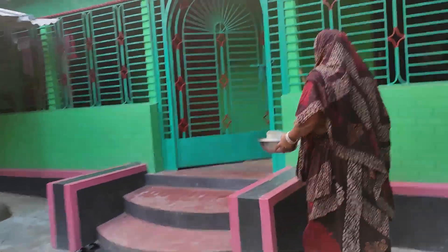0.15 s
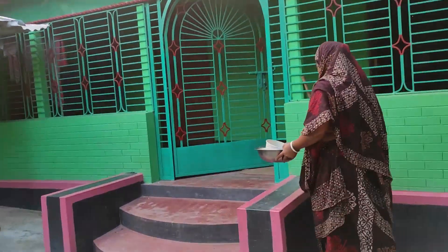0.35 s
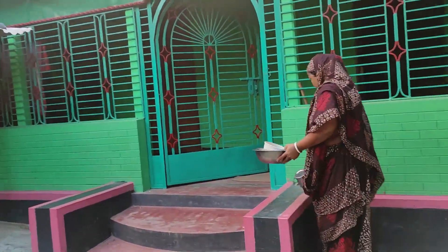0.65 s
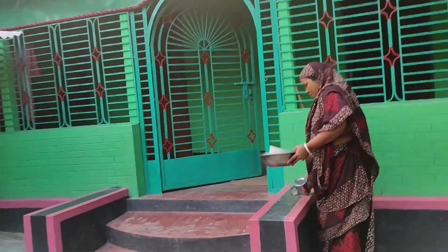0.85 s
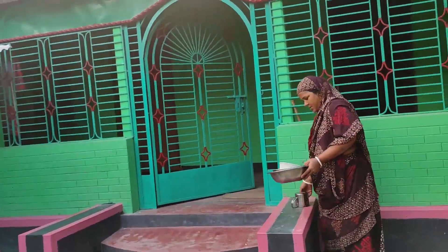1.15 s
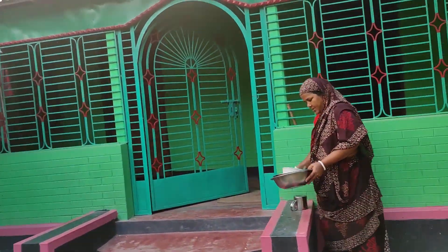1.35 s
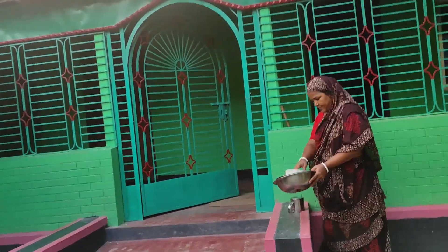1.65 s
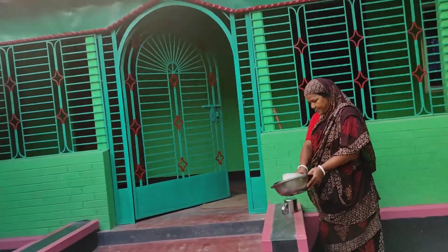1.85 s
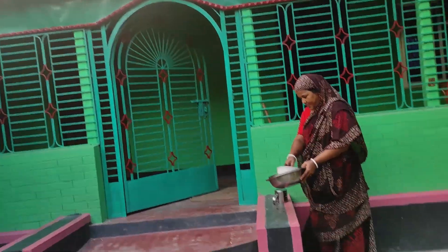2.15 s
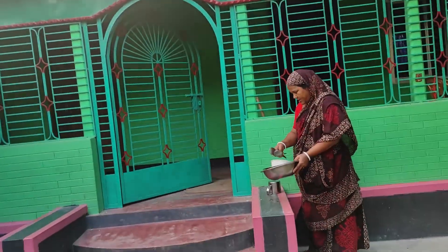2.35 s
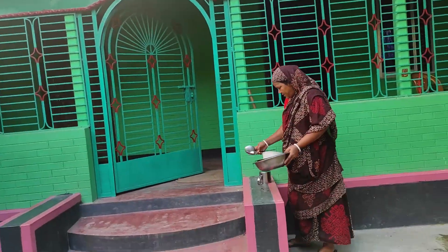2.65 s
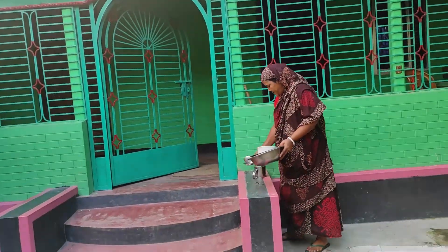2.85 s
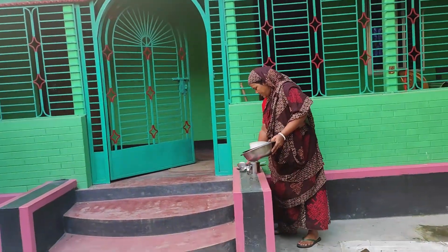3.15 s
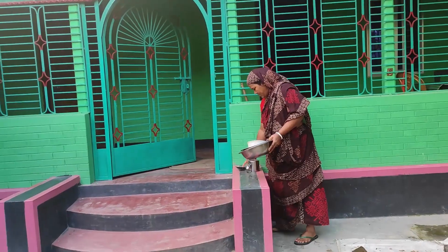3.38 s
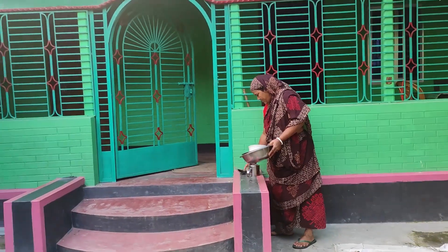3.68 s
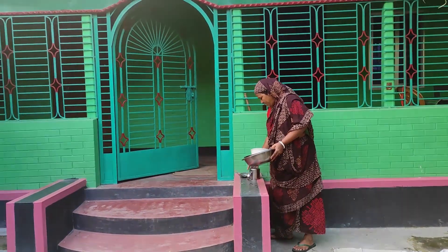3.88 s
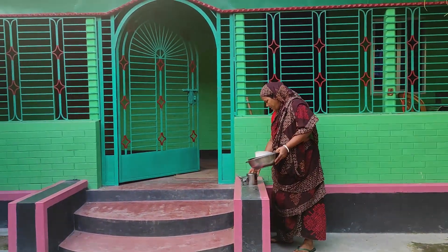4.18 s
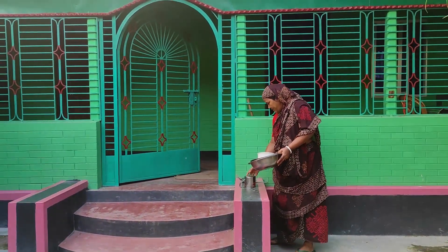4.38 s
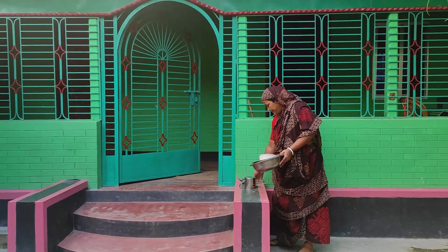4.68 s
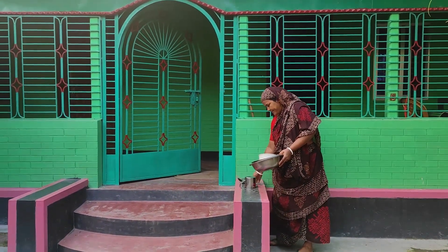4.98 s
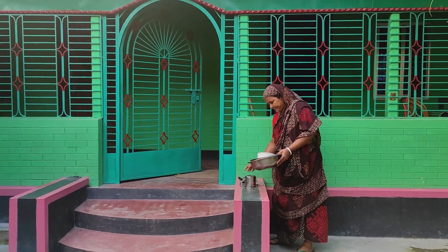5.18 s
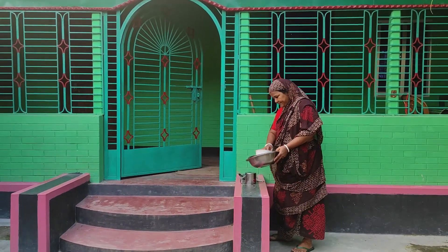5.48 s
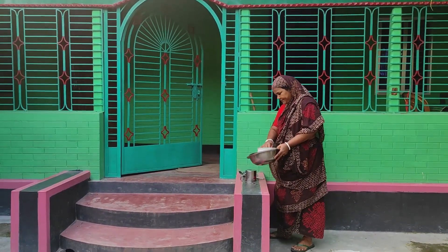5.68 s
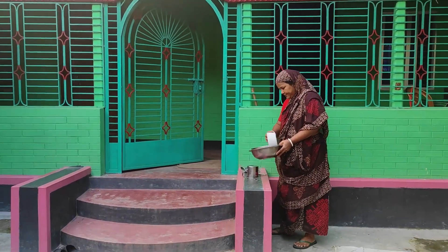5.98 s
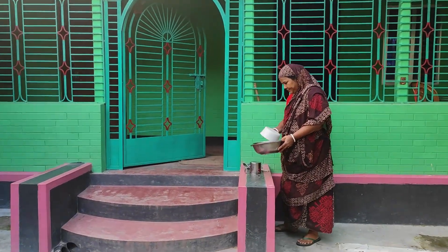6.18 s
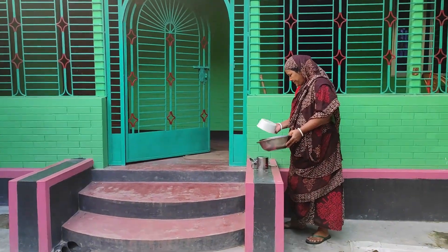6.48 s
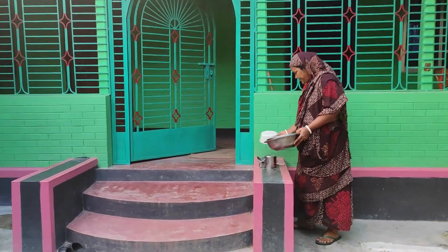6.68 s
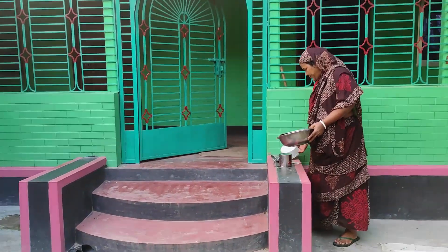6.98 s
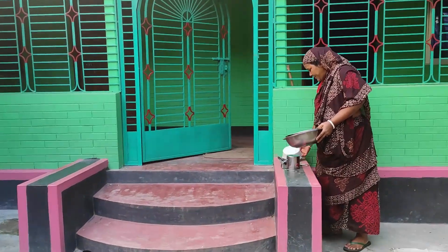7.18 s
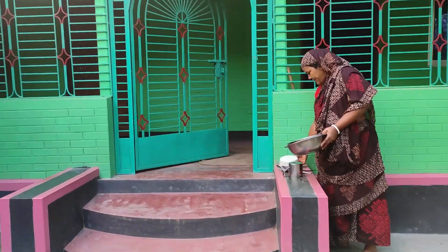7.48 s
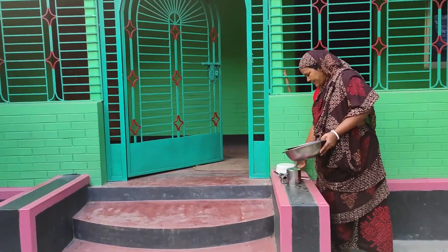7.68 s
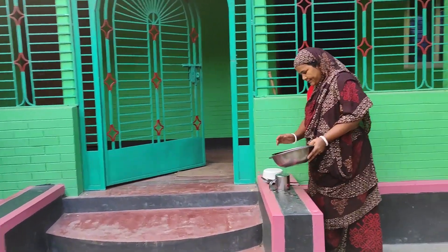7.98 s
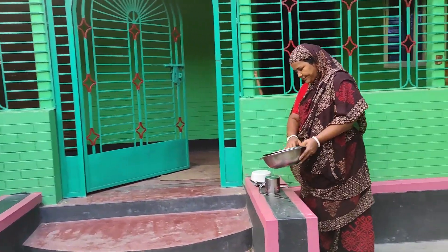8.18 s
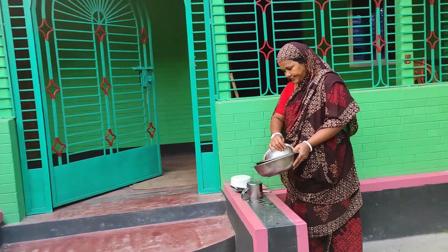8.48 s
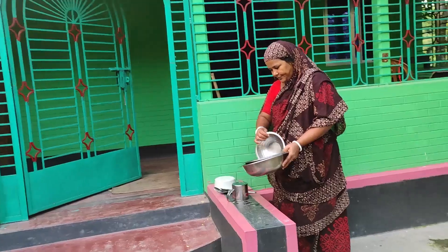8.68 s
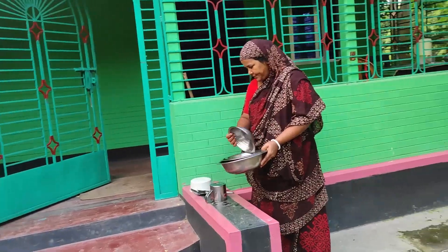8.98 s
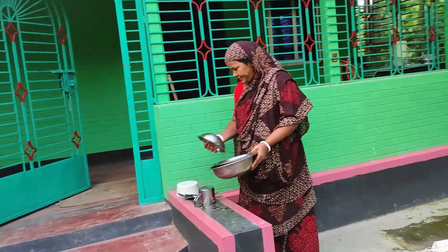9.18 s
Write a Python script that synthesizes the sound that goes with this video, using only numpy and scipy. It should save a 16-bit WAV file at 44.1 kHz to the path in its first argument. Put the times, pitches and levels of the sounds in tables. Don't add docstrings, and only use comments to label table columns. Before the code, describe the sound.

Close in stereo, a steel mug thuds hollowly onto a stone ledge and is dragged, then small cups clink and scrape beside it, the sharpest clang a third of the way in. A quiet pause follows, then a tub is set down and a bowl struck brightly. Far off, a broom sweeps faintly over low town rumble, and a bird chirps briefly. The porch adds a short tail.

```python
import sys
import numpy as np
from scipy import signal
from scipy.fft import rfft, irfft, next_fast_len
from scipy.io import wavfile

SR = 44100
rng = np.random.default_rng(int(sys.argv[2]) if len(sys.argv) > 2 else 0)


def dump(signal):
    limited = np.clip(np.atleast_2d(signal).T, -1, 1)
    pcm = np.round(limited * 32767).astype(np.int16)
    wavfile.write(sys.argv[1], SR, pcm)


def elevation(decibels):
    levels = np.asarray(decibels, float)
    return 10 ** (levels / 20)


N = 411894

# f/Hz, width/Hz, level/dB
MUG = [(2034, 13, -5), (2160, 42, -3.5), (2490, 37, -5), (3470, 30, -1), (3770, 180, 2.5), (5100, 59, 3),
       (6590, 450, -15.5), (8490, 270, -16)]
MUG_PUSHED = [(2010, 60, -13), (2160, 34, -7.5), (2540, 120, -4), (3530, 56, -1), (3860, 50, 3),
              (5100, 72, -12.5), (4270, 46, -12.5), (8350, 140, -18.5)]
CUP = [(2480, 73, -12), (3175, 98, -0.5), (3810, 25, -0.5), (4160, 35, -10), (4520, 45, 4.5),
       (6500, 41, -8), (6700, 40, -20), (7200, 76, -21), (8160, 47, -11.5), (9000, 110, -1),
       (9600, 65, -14), (11000, 80, -15)]
CUP_SLID = [(2570, 120, -1), (3640, 62, -1), (4474, 25, 2.5), (5140, 50, -14), (5920, 55, -17),
            (6730, 62, -13), (7000, 47, -5.5), (8350, 39, 0), (8410, 40, 0), (10950, 85, -4.5),
            (11600, 33, -22), (11800, 31, -23)]
TUMBLER = [(2620, 240, -4), (3260, 38, -2.5), (4500, 61, -1), (5400, 45, -8.5), (6680, 37, 4),
           (8000, 35, -6), (8420, 240, 3.5), (9600, 31, -4), (11300, 33, -5), (11500, 27, -10.5),
           (11900, 30, -20), (12300, 63, -17)]
TUMBLER_SLID = [(2770, 87, -7.5), (3460, 106, 1.5), (3590, 38, -7), (4390, 43, -7), (5150, 39, -13),
                (6400, 25, -7), (6850, 50, -1.5), (8580, 53, -1.5), (11000, 130, -13.5), (11900, 27, -31),
                (12700, 91, -24.5), (13200, 85, -28)]
SMALL_CUP = [(2456, 59, -0.5), (3830, 46, -0.5), (4500, 55, -6), (6380, 35, 1), (7980, 74, -3),
             (8560, 23, 6), (9600, 43, -3), (10800, 100, -17), (11700, 28, -12), (12200, 41, -20),
             (12980, 62, -20)]
SMALL_CUP_ROCKED = [(2740, 67, -1), (5870, 84, 0.5), (7600, 46, 1), (11300, 180, -18), (12400, 54, -22),
                    (12700, 85, -20), (13400, 56, -21)]
SMALL_CUP_SLID = [(2665, 46, 4), (3360, 98, -7), (6600, 190, -1.5), (8240, 170, -2), (8700, 110, -1.5),
                  (10530, 110, -13), (11700, 76, -20), (12400, 53, -16), (12900, 39, -21), (13300, 33, -17)]
SECOND_CUP = [(2580, 89, -5), (3390, 200, -4.5), (4580, 84, -4), (5300, 58, -2), (5700, 45, -7),
              (6780, 87, -0.5), (8420, 190, 0.5), (9700, 53, -6), (11070, 220, -6.5), (12300, 33, -18),
              (12600, 59, -18), (13500, 69, -13.5)]
SECOND_CUP_SLID = [(2750, 150, -2.5), (5400, 170, -4.5), (6430, 39, 2), (8550, 45, 4), (9200, 48, -5.5),
                   (10200, 100, -14), (11200, 66, -7), (12500, 110, -16)]
THIRD_CUP = [(3580, 32, 0), (4660, 23, -1), (6650, 29, -4), (6930, 43, -9), (10200, 31, -13),
             (10500, 30, -25), (10800, 69, -16), (11600, 130, -20)]
TUB_RUBBED = [(3370, 90, -1), (2700, 100, -2), (1800, 88, -6), (4670, 160, -8.5), (8040, 58, -5),
              (8500, 120, -2.5)]
LID = [(3440, 250, 3), (6800, 490, -9), (8350, 35, 0), (8460, 51, 4), (9000, 75, 0.5), (11000, 150, -12)]
BOWL = [(2100, 16, -4), (2480, 77, -3), (3170, 99, -13), (3560, 110, 4.5), (4750, 34, -20),
        (5600, 220, -23), (6240, 97, -16), (6970, 240, -20), (8270, 126, -5.5)]
BOWL_SLID = [(2030, 240, -7.5), (2450, 29, -4), (3000, 160, -4.5), (3490, 110, 3), (5040, 50, -17),
             (5860, 41, -16), (6650, 130, -6.5), (8330, 260, -7)]
BOWL_LIFTED = [(3300, 120, -0.5), (3570, 140, 2.5), (4500, 59, -21), (5000, 24, -21), (6240, 160, -18),
               (6960, 100, -20), (8300, 72, -5)]
# f/Hz, width/Hz, level/dB
MUG_SET_AIR = [(577.7, 22.5, 1.8), (655, 34, -4), (594, 6.3, -15), (1066, 4.3, -10.5), (914, 30, -31),
               (1800, 88, -25)]
MUG_DRAG_AIR = [(585, 15, -4.5), (640, 18, 1.5), (478, 33, -7), (335, 30, -14.5), (1071, 7.1, -15.5),
                (1565, 9.9, -12.5), (1653, 8.1, -12), (964, 13, -17), (1287, 9.3, -23)]
SMALL_CUP_AIR = [(644, 190, -16), (1700, 48, -13.5)]
CUP_AIR = [(1540, 55, -5.5), (632, 43, -8.5), (1335, 52, -7)]
MUG_PUSH_AIR = [(315, 73, -12), (632, 19, 1), (955, 37, -14.5), (1100, 7.8, -10), (1294, 7, -7.5)]
BASIN_AIR = [(696, 200, -5)]
TUB_AIR = [(583, 73, 0), (284, 48, -6.5), (846, 30, -10.5), (643, 33, -5.5)]
TUB_SET_AIR = [(416.5, 20.4, 7), (582.3, 8.7, 7), (291, 18, -3), (840, 34, -13), (1430, 180, -7)]
BOWL_AIR = [(614, 100, 2), (692.5, 14.6, 8), (796, 64, -1), (1030, 120, -2.5), (1280, 110, -8.5),
            (1720, 100, -9.5)]


def hollow_bodies():
    # modes, grit level/dB, grit tilt/(dB per octave)
    vessels = [
        (MUG_SET_AIR, -32, .2),
        (MUG_DRAG_AIR, -35.5, .1),
        (SMALL_CUP_AIR, 2.8, .1),
        (CUP_AIR, 0.1, .1),
        (MUG_PUSH_AIR, -22, .1),
        (BASIN_AIR, -7, .1),
        (TUB_AIR, -7.5, .2),
        (TUB_SET_AIR, 1.7, .1),
        (BOWL_AIR, -10.5, .1),
    ]
    ends = [1.125, 1.46, 2.3, 3.5, 4.56, 5.85, 7.5, 7.92, 9.0]
    # t/s, peak level/dB
    knocks = [(.878, -8), (.926, -12.5), (.941, -17.5), (.99, -29), (1.037, -33), (1.084, -40.5),
              (1.109, -34.5), (1.136, -24), (1.146, -17), (1.16, -13.5), (1.199, -21.5), (1.259, -24),
              (1.303, -30), (1.376, -36), (1.816, -37), (2.062, -40), (3.28, -39), (4.172, -44),
              (5.609, -51), (7.072, -36.5), (7.226, -40), (7.338, -36.5), (7.657, -39), (7.666, -16.5),
              (7.686, -20.5), (8.294, -47), (8.462, -28), (8.497, -27), (8.51, -19.5), (8.619, -36),
              (8.648, -35), (8.843, -38)]
    # peak t/s, level/dB, swell/s, fade/s
    shoves = [(.96, -45.5, 0.059, 0.26), (1.17, -26.5, 0.044, 0.24), (1.23, -32, 0.06, 0.067),
              (1.3, -33.5, .06, 0.13), (1.824, -51.5, 0.07, 1.15), (3.285, -49, .012, .2),
              (3.351, -48, 0.074, 0.15), (4.179, -32, 0.095, 0.059), (4.26, -33.5, 0.1, 0.22),
              (4.33, -37, 0.1, 0.24), (5.656, -55, 0.12, 0.46), (7.074, -47.5, 0.0087, 0.078),
              (7.237, -49, 0.17, 1.4), (7.657, -32, 0.0034, 0.15), (8.304, -54, 0.018, 0.3),
              (8.466, -27.5, 0.0078, 0.17), (8.656, -38.5, 0.24, 0.15), (8.852, -48, 0.067, 0.22)]
    # f/Hz, level/(dB per Hz)
    grit = [(120, -37.5), (300, -15.5), (700, -6.5), (1500, -18), (2200, -12.5), (4000, -41)]
    return sum(touch(*t, grit, grain_db=2.5, wander_db=2.5, spread_db=2.0, chatter_s=0.00057,
                     contact_hz=770, ripple_db=5.0, twin_share=0)
               for t in touches(vessels, ends, knocks, shoves))


def bright_walls():
    # modes, grit level/dB, grit tilt/(dB per octave)
    vessels = [(MUG, -0.603, 0.096), (SMALL_CUP, 3.4, .1), (SMALL_CUP_ROCKED, 4.5, -0.58),
               (SMALL_CUP_SLID, 3.4, 0.62), (LID, 12, 0.086), (CUP, 1.1, 0.32), (CUP_SLID, 3.9, 3.6),
               (TUMBLER, 3.6, 0.58), (TUMBLER_SLID, 1.9, -0.097), (MUG_PUSHED, -1, .1),
               (SECOND_CUP, 2.6, 0.11), (SECOND_CUP_SLID, 4.5, .1), (THIRD_CUP, 5.5, .1),
               (TUB_RUBBED, 7.6, -0.78), (LID[:1], 4, -9.5), (LID + [(2530, 89, -12.5), (8800, 56, 0.0)],
               1.2, 1.7), (LID[:1], 6.7, 0), (BOWL, 3.6, -4.5), (BOWL_SLID, 3.4, -2.6),
               (BOWL_LIFTED, 4, -3.5)]
    ends = [1.5, 1.96, 2.125, 2.31, 2.9, 3.355, 3.6, 3.876, 4.165, 4.58, 5.1, 5.25, 5.7, 7.54, 7.695, 7.86,
            8.455, 8.61, 8.835, 9.0]
    # t/s, peak level/dB
    clinks = [(0.7855, -29), (0.8774, -21), (0.9247, -24.5), (0.9376, -36), (1.1585, -30), (1.219, -22),
              (1.362, -41), (1.8185, -33), (1.857, -25), (1.9832, -41), (2.0611, -32), (2.1344, -28),
              (2.1935, -35), (2.2448, -33), (2.7428, -36.5), (2.827, -31), (3.2813, -13.5), (3.311, -26),
              (3.3605, -22), (3.377, -27), (3.7055, -39), (3.74, -24.5), (3.8058, -18), (3.828, -23),
              (3.882, -18), (4.1735, -34), (4.2413, -42), (4.8428, -37), (4.8613, -33), (4.885, -24.5),
              (5.108, -31), (5.4407, -38), (7.0713, -41), (7.2243, -31), (7.251, -31), (7.338, -33),
              (7.3748, -35), (7.656, -39), (7.6673, -23), (7.7009, -36), (8.2924, -43.5), (8.3367, -46),
              (8.4095, -37), (8.4626, -13), (8.465, -16), (8.473, -18), (8.6178, -35), (8.8426, -24),
              (8.8972, -35)]
    # peak t/s, level/dB, swell/s, fade/s
    shoves = [(0.879, -35.5, 0.0041, 0.067), (.939, -41, 0.046, 0.12), (1.165, -27.5, 0.013, 0.031),
              (1.219, -38.5, 0.12, 0.26), (1.287, -35, 0.12, 0.13), (1.823, -35.5, 0.015, 0.15),
              (1.862, -37.5, 0.031, 0.058), (1.988, -39.5, 0.056, 0.081), (2.068, -45, 0.024, 0.17),
              (2.14, -41.5, 0.063, 0.25), (2.2, -42, .04, 0.28), (2.824, -51, 0.028, 0.044),
              (3.282, -27.5, 0.0052, 0.55), (3.363, -26.5, 0.046, 0.15), (3.45, -35, 0.14, 0.17),
              (3.706, -40, 0.0045, 0.12), (3.742, -33.5, 0.006, 0.69), (3.807, -33.5, 0.01, 0.18),
              (3.884, -34, 0.016, 0.12), (3.95, -34.5, .15, 0.7), (4.196, -37.5, 0.037, 0.046),
              (4.24, -39, 0.07, 0.56), (4.864, -31.5, 0.018, 0.17), (4.96, -42.5, 0.098, 1.5),
              (5.119, -37, 0.037, 0.13), (5.445, -41.5, 0.031, 0.26), (7.23, -47, 0.022, 0.33),
              (7.295, -38.5, 0.13, 0.11), (7.385, -38.5, 0.059, 0.13), (7.667, -42, 0.0099, 0.068),
              (7.703, -35, 0.0096, 0.077), (8.341, -49, 0.069, 0.097), (8.44, -42, 0.078, 0.11),
              (8.465, -29, 0.016, 0.15), (8.622, -35.5, 0.055, 0.17), (8.72, -49, 0.11, 0.37),
              (8.845, -44, 0.0055, 0.093), (8.9, -39.5, 0.066, 0.14)]
    # f/Hz, level/(dB per Hz)
    grit = [(710, -61), (1200, -22), (1950, -19.5), (2650, -9.5), (3600, -10), (8600, -13), (14300, -34.5),
            (15300, -58.5)]
    return sum(touch(*t, grit, grain_db=1.5, wander_db=4.0, spread_db=3.0, chatter_s=0.0033,
                     contact_hz=6900, ripple_db=5.0, twin_share=0.0054)
               for t in touches(vessels, ends, clinks, shoves))


def touches(vessels, ends, knocks, shoves):
    for (modes, grit_db, tilt_db), since, end in zip(vessels, [0] + ends, ends):
        own_shoves = [row for row in shoves if since <= row[0] < end]
        own_knocks = [row for row in knocks if since <= row[0] < end]
        yield own_shoves, end, own_knocks, modes, grit_db, tilt_db


def touch(shoves, end_s, knocks, modes, grit_db, tilt_db, grit, grain_db, wander_db, spread_db,
          chatter_s, contact_hz, ripple_db, twin_share):
    # f/Hz, level/dB
    balance = [(60, 3.5), (200, 2.5), (690, -1), (1270, -3), (2340, 5), (4310, 4), (7940, 4), (14600, 0.5)]
    lead_s, left_lag_s = 0.15, 60e-6
    start = int((min(shoves[0][0], knocks[0][0]) - lead_s) * SR)
    size = 2 * next_fast_len(int((end_s + .3) * SR - start) // 2)
    hz = np.arange(size // 2 + 1) * SR / size
    delay = np.exp(-2j * np.pi * hz / SR)
    t = (start + np.arange(size)) / SR

    sliding = np.clip((end_s + .012 - t) / .03, 0, 1)
    grains = rng.standard_normal(size)
    rub = sliding * slide_gain(shoves, t) * elevation(grain_db * drift(44.6, size))

    knock_s, knock_db = np.array(knocks).T
    at = np.round(knock_s * SR).astype(int) - start
    arrivals = np.exp(-2j * np.pi * hz * at[:, None] / SR)
    chatter = rng.standard_normal(1024) * np.exp(-np.arange(1024) / SR / chatter_s)
    chatter = rfft(chatter, size) / (1 + 1j * hz / contact_hz)

    ripple_hz = np.arange(0, SR / 2 + 90, 45)
    dense = [ripple_db * np.interp(hz, ripple_hz, row) for row in rng.standard_normal((9, len(ripple_hz)))]
    apart = np.minimum(hz / 2500, 1)
    colour = at_hz(grit, hz) + tilt_db * np.log2(hz / 4000 + .1)
    shapes = []
    for i in (0, 3, 6):
        ports = [causal(colour + dense[i] + apart * dense[i + j]) for j in (1, 2)]
        shapes.append(elevation(grit_db - 14.0) * np.array(ports))
    for k, (mode_hz, width_hz, db) in enumerate(modes):
        shapes.append((-1) ** k * elevation(db) * mode_peak(mode_hz, width_hz, twin_share, delay))
    centres_hz = [0, 0, 0] + [mode[0] for mode in modes]

    rub_gain = 1 / np.sqrt(sum(np.mean(abs(s) ** 2) for s in shapes))
    knock_gain = 1 / abs(irfft(sum(shapes) * chatter)).max()
    strength = rng.standard_normal((len(knocks), 32))
    facing = rng.standard_normal((32, 2))
    heard = 0
    for k, (shape, centre_hz) in enumerate(zip(shapes, centres_hz)):
        clicks = elevation(knock_db + spread_db * strength[:, k]) @ arrivals
        rocking = elevation(wander_db * drift(22.06, size) - wander_db ** 2 / 9)
        feed = np.roll(grains, k * SR // 50) * rub * rocking
        aim = facing[k] @ [.1, 1.2j] * centre_hz / (centre_hz + 2000)
        turn = np.exp(aim * np.array([[1], [-1]]))
        heard = heard + shape * turn * (rub_gain * rfft(feed) + knock_gain * chatter * clicks)
    lean = elevation(at_hz(balance, hz) / 2) * delay ** (left_lag_s * SR / 2)
    out = np.zeros((2, N + size))
    out[:, start:start + size] = irfft(heard * [lean, 1 / lean])
    return out[:, :N]


def mode_peak(mode_hz, width_hz, twin_share, delay):
    r = np.exp(-np.pi * np.clip(width_hz, 2, 160) / SR)
    twins_hz = mode_hz * (1 + twin_share * np.array([[-1], [1]]))
    poles = 1 - 2 * r * np.cos(2 * np.pi * twins_hz / SR) * delay + (r * delay) ** 2
    return (1 - r * r) / 4 * ((1 - delay ** 2) / poles).sum(0)


def slide_gain(shoves, t):
    range_db = 20
    power = 0
    for peak_s, db, swell_s, fade_s in shoves:
        away = np.maximum((peak_s - t) / swell_s, (t - peak_s) / fade_s)
        power = power + elevation(2 * (db - range_db * away))
    return np.sqrt(power)


def causal(db):
    cepstrum = irfft(db * np.log(10) / 20)
    half = len(cepstrum) // 2
    cepstrum[1:half] *= 2
    cepstrum[half + 1:] = 0
    return np.exp(rfft(cepstrum))


def drift(rate_hz, size):
    knots = rng.standard_normal(int(size / SR * 60) + 2)
    return 1.2 * np.interp(np.arange(size) / SR * rate_hz, np.arange(len(knots)), knots)


def at_hz(points, hz):
    table_hz, value = np.array(points).T
    return np.interp(np.log(hz + 1), np.log(table_hz + 1), value)


def ringing_vessels():
    # start t/s, f/Hz, t/s when a hand damps it (if any)
    strikes = [(8.5, 325), (8.655, 325), (8.845, 620), (8.95, 325), (3.283, 1599), (3.282, 2300),
               (3.282, 3230), (3.282, 4485), (.937, 3300), (.926, 3900), (1.155, 1567), (1.259, 637, 1.322),
               (3.806, 8450), (3.882, 3560), (3.882, 2750), (4.165, 634, 4.203), (4.24, 3850),
               (5.445, 4630), (7.072, 590), (1.858, 7940), (3.283, 3815), (4.3, 3860), (8.5, 700),
               (4.3, 637, 4.365)]
    # level/dB, t60/s, rise/s
    rings = [(-38.5, 0.87, 0.011), (-29, 0.61, 0.017), (-49.5, 0.93, 0.0044), (-48, 0.96, 0.038),
             (-33, 0.4, 0.013), (-31.5, .1, .001), (-31, 0.11, .001), (-30.5, 0.26, .001),
             (-31.5, 0.048, .001), (-33.5, 0.071, .001), (-37, 0.47, .008), (-20, 0.7, 0.0028),
             (-32, 0.097, .001), (-35, 0.09, .001), (-37, 0.095, .001), (-26, 0.72, 0.0063), (-46, .6, .02),
             (-51, 0.68, 0.011), (-27, 0.074, 0.0026), (-38, 0.13, .001), (-35, .3, .002), (-44, .8, .03),
             (-33, .2, .008), (-34, 1.4, .012)]
    hand_db_per_s = 450
    out = np.zeros(N + 2 * SR)
    for (start_s, hz, *held), (db, t60, rise_s) in zip(strikes, rings):
        age = np.arange(int(min(t60, 2) * SR)) / SR
        start = int(start_s * SR)
        damped_db = hand_db_per_s * np.maximum(start_s + age - held[0], 0) if held else 0
        decay = elevation(db - 60 * age / t60 - damped_db)
        rise = 1 - np.exp(-age / rise_s)
        out[start:start + len(age)] += decay * rise * np.sin(2 * np.pi * hz * age)
    return out[:N]


def porch(x, t60, cut_hz):
    age = np.arange(int(.4 * SR)) / SR
    tail = rng.standard_normal((2, len(age))) * elevation(-60 * age / t60) * (age > .003)
    tail = signal.sosfilt(signal.butter(1, [700, cut_hz], "band", fs=SR, output="sos"), tail)
    tail = tail / np.sqrt((tail ** 2).sum(1, keepdims=True))
    return signal.fftconvolve(x.mean(0)[None], tail)[:, :N]


def broom():
    # middle t/s, level/dB, length/s
    sweeps = [(.18, -57, 0.3), (.62, -51.5, 0.62), (1.76, -59, 0.49), (2.67, -53.5, 0.71),
              (3.22, -62.5, 0.98), (4.62, -56.5, 0.44), (5.3, -60.5, 0.58), (5.87, -57, 0.42),
              (6.3, -66, 0.25), (6.6, -57, 0.39), (7.62, -59.5, 0.15), (8.03, -55.5, 0.28),
              (9.16, -57.5, 0.29)]
    # f/Hz, level/(dB per Hz)
    bristles = [(530, -7), (900, -2.5), (1140, -13.5), (1960, -1), (2960, 2.5), (8430, -6), (14300, -29.5),
                (15000, -53)]
    return strokes(sweeps, steady_db=-62.5) * far_noise(bristles, alike_share=.6, patchy_db=.5)


def bird(db, hz):
    # t/s, length/s
    chirps = [(6.235, .03), (6.275, .03), (6.42, .06), (6.79, .03), (6.83, .035), (6.9, .03)]
    t = np.arange(N) / SR
    calling = sum(np.clip(1 - abs(2 * (t - s) / length - 1) ** 3, 0, 1) for s, length in chirps)
    band = signal.butter(2, [.97 * hz, 1.03 * hz], "band", fs=SR, output="sos")
    blur = signal.sosfilt(band, rng.standard_normal((2, N)))
    return elevation(db) * calling * blur / np.sqrt(np.mean(blur ** 2))


def town():
    # f/Hz, level/(dB per Hz)
    rumble = [(15, -20.5), (25, 2), (196, -1), (488, -9), (879, -12), (3180, -16.5), (5000, -32),
              (15000, -59)]
    return elevation(-57) * far_noise(rumble, alike_share=0.74, patchy_db=0.0)


def wind():
    # middle t/s, level/dB, length/s
    puffs = [(.164, -40.5, 0.12), (.3, -40.5, 0.26), (6.38, -52.5, 0.8), (7.07, -51, 0.36),
             (9.272, -45, 0.046)]
    # f/Hz, level/(dB per Hz)
    gust = [(12, -37), (20, 4), (76, 9), (158, -1.5), (275, -31.5), (400, -17), (520, -55), (880, -120)]
    return elevation(-5.0) * strokes(puffs, steady_db=-55.5) * far_noise(gust, alike_share=0.22, patchy_db=5.0)


def strokes(rows, steady_db):
    t = np.arange(0, N + 64, 64) / SR
    power = elevation(2 * steady_db)
    for middle_s, db, length_s in rows:
        power = power + elevation(2 * db - 176 * ((t - middle_s) / length_s) ** 2)
    return np.interp(np.arange(N) / SR, t, np.sqrt(power))


def far_noise(spectrum, alike_share, patchy_db):
    # f/Hz, level/dB
    balance = [(60, -2), (130, -1.5), (290, -1.5), (630, -1), (1390, 1), (3040, 7.5), (6670, -2),
               (14600, 11)]
    # f/Hz, share 0-1
    likeness = [(30, 0.27), (125, 1), (300, 0.9), (700, 0.36), (1500, 0), (3000, 0.07), (8000, 0)]
    size = next_fast_len(N)
    hz = np.arange(size // 2 + 1) * SR / size
    mid, side = rfft(rng.standard_normal((2, size)) * elevation(patchy_db * drift(15, size)))
    alike = np.clip(alike_share * at_hz(likeness, hz), 0, 1)
    lean = elevation(at_hz(balance, hz) / 2 * [[1], [-1]])
    pair = np.sqrt(1 + alike) * mid + np.sqrt(1 - alike) * side * [[1], [-1]]
    out = irfft(pair * lean * elevation(at_hz(spectrum, hz)), size)[:, :N]
    return out / np.sqrt(np.mean(out.mean(0) ** 2))


def scene():
    near = hollow_bodies() + bright_walls() + ringing_vessels()
    far = broom() + town() + wind()
    tail = elevation(-8.5) * porch(near, t60=0.46, cut_hz=21000)
    return near + tail + bird(db=-64.5, hz=5060) + far


def low_pass(x):
    return signal.sosfilt(signal.butter(12, 15230, fs=SR, output="sos"), x)


def record(dry):
    return low_pass(dry)


dry = scene()
out = record(dry)
dump(out)
```